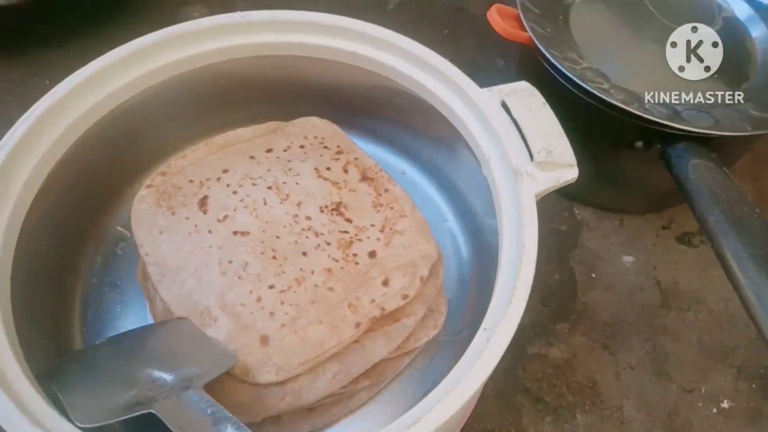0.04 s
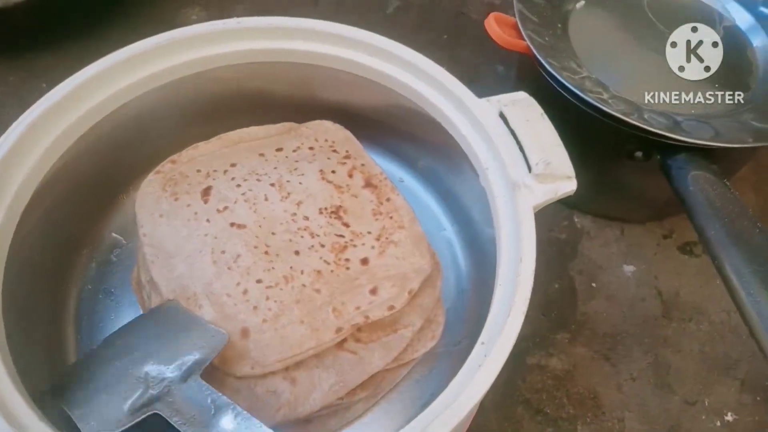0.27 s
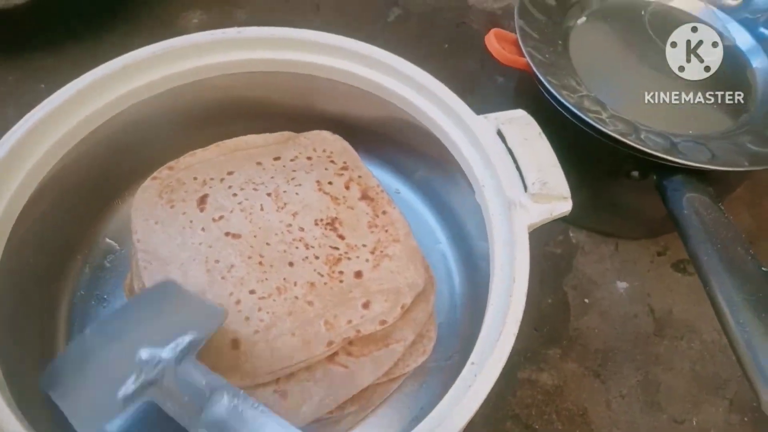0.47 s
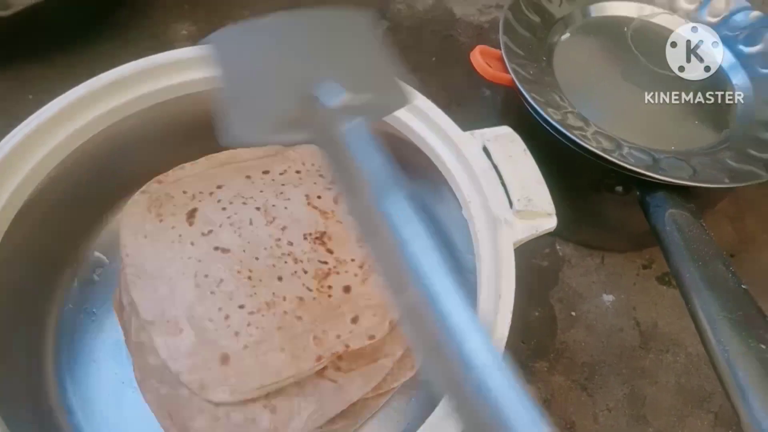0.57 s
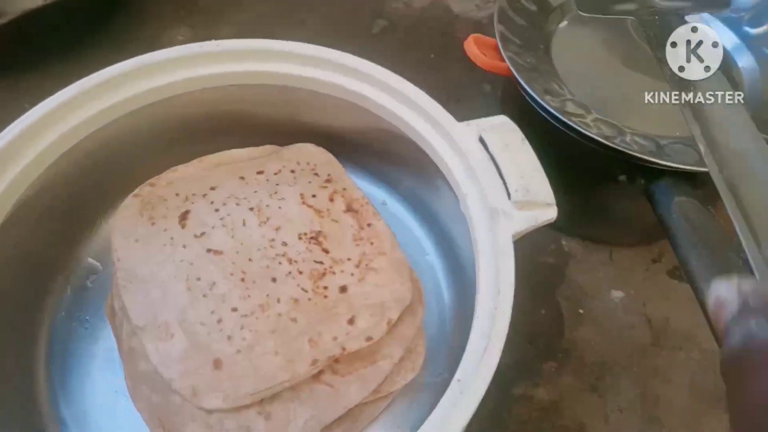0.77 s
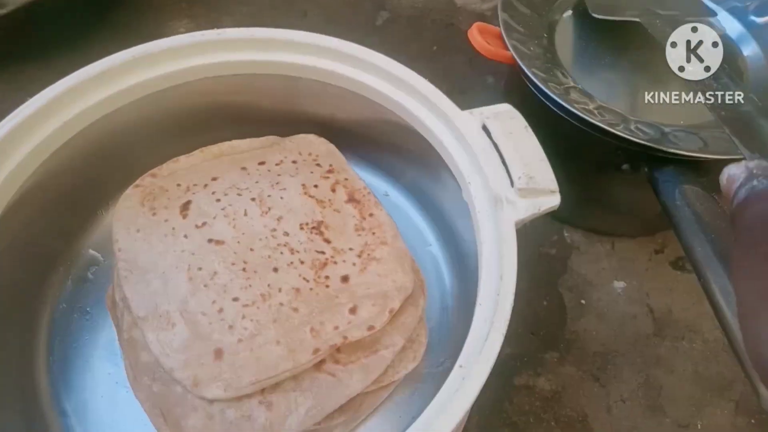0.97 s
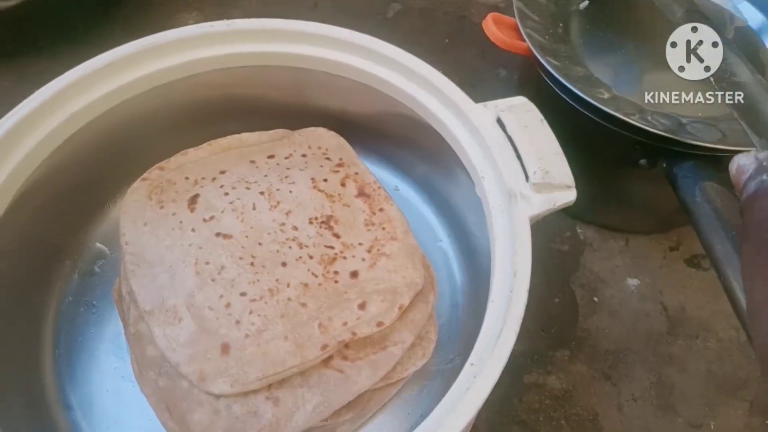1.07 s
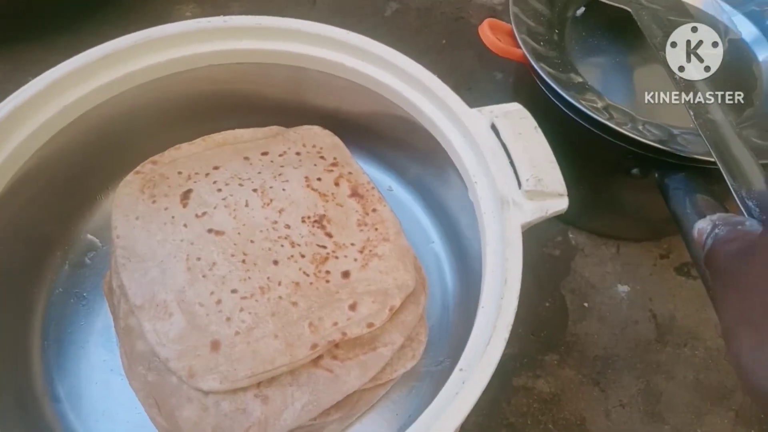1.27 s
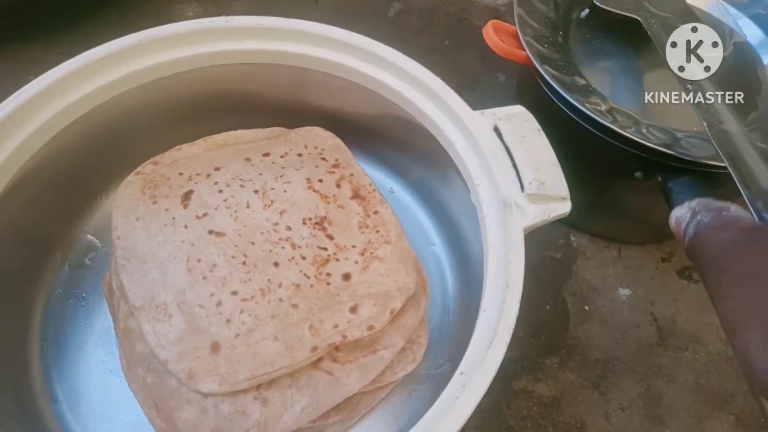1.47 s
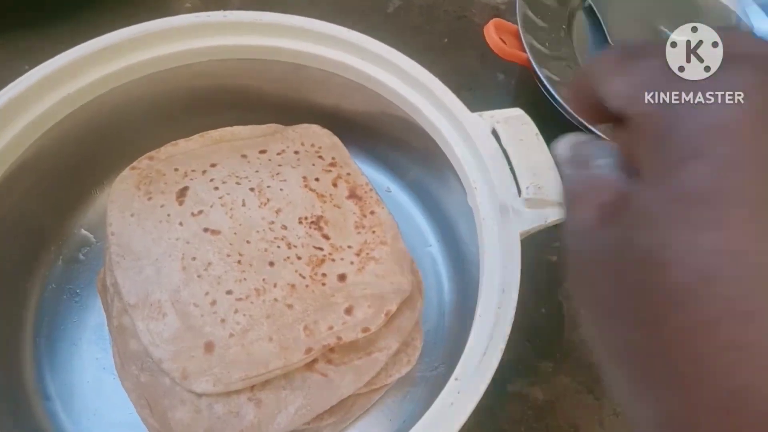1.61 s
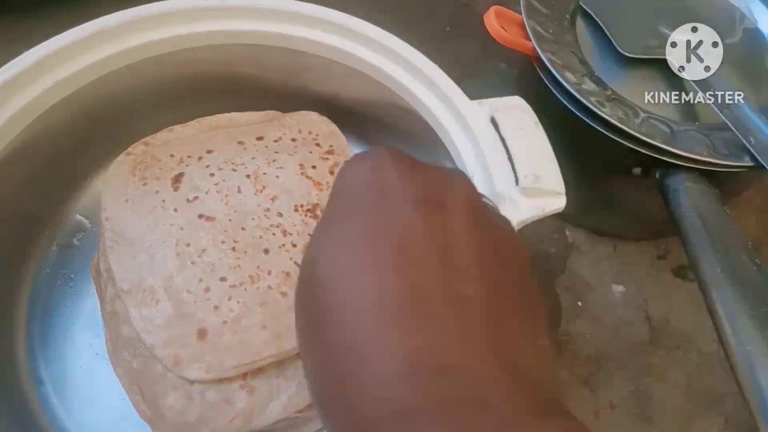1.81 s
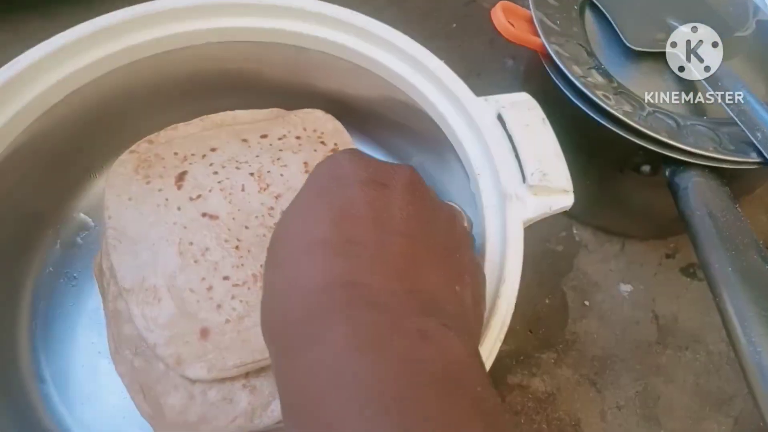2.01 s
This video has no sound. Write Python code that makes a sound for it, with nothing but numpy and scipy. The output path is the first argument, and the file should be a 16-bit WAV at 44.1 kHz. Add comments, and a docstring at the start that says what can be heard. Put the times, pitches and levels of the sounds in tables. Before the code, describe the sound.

Steel dishes clattering under a spatula, close to a phone in a small hard kitchen. A thin rasp with a faint squeal opens, then flatbread flops into a pot with a heavy dull thud at 0.24 s and softer ones until 0.5. A handle knocks woodenly at 0.77; clinks follow at 0.85-1.1. After a lull, denser, louder clanks and chatter run 1.4-1.85, then fade into quiet air.

```python
"""A stack of steel dishes in a small hard kitchen, close to a phone: a spatula laid on it makes them clink, chatter, rock.
Blows ring decaying modes and throw noise crashes; chatter is random tiny impacts on the same modes.
Before that the steel spatula scrapes out from under flatbread (noise, grit, narrow singing bands),
and the bread flops into an insulated pot (low modes, noise slaps). Handle knocks on the counter, steady air, clipped peaks.
"""
import sys
import numpy as np
from scipy import signal
from scipy.fft import rfft, irfft
from scipy.io import wavfile

SR = 44100
rng = np.random.default_rng(int(sys.argv[2]) if len(sys.argv) > 2 else 0)


def attenuation_scalar(level_db):
    """Turn a level in dB into a linear amplitude multiplier (20 dB per decade)."""
    decades = np.asarray(level_db, float) / 20
    return 10 ** decades


def log_audio(samples):
    """Write samples as a 16-bit WAV file to the path given in sys.argv[1]."""
    # one column per channel
    frames = np.atleast_2d(samples).T
    # limit to full scale, then quantise
    limited = np.clip(frames, -1, 1)
    pcm = np.round(limited * 32767).astype(np.int16)
    wavfile.write(sys.argv[1], SR, pcm)


N = 90404


def unit(x):
    """Scale to rms 1."""
    return x / np.sqrt(np.mean(x ** 2) + 1e-20)


def along(points, hz):
    """Interpolate (frequency [Hz], value) points on a log frequency axis."""
    f, v = np.transpose(points)
    return np.interp(np.log(hz + 1), np.log(f + 1), v)


def level(rows):
    """Gain per sample from (time [s], level [dB]) rows, -120 dB outside them."""
    s, db = np.transpose(rows)
    return attenuation_scalar(np.interp(np.arange(N) / SR, s, db, left=-120, right=-120))


def noise(response, size=N):
    """Noise of rms 1 with a given magnitude response."""
    hz = np.fft.rfftfreq(size, 1 / SR)
    return unit(irfft(rfft(rng.standard_normal(size)) * response(hz), size))


def dying(colour, t60, size):
    """Noise burst, each frequency decaying at its own rate; rms 1 over the first 5 ms."""
    hz, t, z = signal.stft(rng.standard_normal(size), SR, nperseg=128)
    decay_db = -60 * t / along(t60, hz)[:, None]
    z = z * attenuation_scalar(along(colour, hz)[:, None] + decay_db)
    x = signal.istft(z, SR, nperseg=128)[1][:size]
    return x / np.sqrt(np.mean(x[:SR // 200] ** 2))


def ringing(modes, scatter_db, attack_s, size=SR // 2):
    """One blow on a set of decaying modes, each level scattered at random."""
    hz, db, t60 = np.transpose(modes)[:, :, None]
    t = np.arange(size) / SR
    db = db + scatter_db * rng.standard_normal(hz.shape)
    tones = attenuation_scalar(db - 60 * t / t60) * np.sin(2 * np.pi * hz * t)
    return tones.sum(0) * (1 - np.exp(-t / attack_s))


def damped(x, free_s, added_t60_s):
    """x rings freely, then a contact adds a second decay."""
    late_s = np.maximum(np.arange(len(x)) / SR - free_s, 0)
    return x * attenuation_scalar(-60 * late_s / added_t60_s)


def grains(per_s, spread_db):
    """Random tiny impacts of either sign, a few larger than the rest."""
    sizes = np.minimum(rng.exponential(size=N), 3.5)
    return (rng.random(N) < per_s / SR) * rng.choice([-1, 1], N) * attenuation_scalar(spread_db * sizes)


def add(out, s, x):
    """Mix x into out from time s."""
    part = out[round(s * SR):][:len(x)]
    part += x[:len(part)]


# air colour: (frequency [Hz], level [dB per Hz])
AIR_COLOUR = [(12, -38), (20, 1.5), (240, 1), (335, -3.5), (570, -22.5), (674, -17), (916, -13.5),
              (1600, -18), (1740, -18), (5030, -16), (6840, -14), (15800, -45)]


def air():
    """Steady air of the kitchen: coloured stationary noise."""
    return attenuation_scalar(-44.5) * noise(lambda hz: attenuation_scalar(along(AIR_COLOUR, hz)))


# room decay: (frequency [Hz], t60 [s])
ROOM_T60 = [(150, 0.52), (1000, 0.12), (4000, 0.06), (12000, 0.19)]


def room(dry):
    """Diffuse reflections: convolution with decaying noise, 250 samples late."""
    tail = dying([(100, 0)], ROOM_T60, SR // 2)
    wet = signal.fftconvolve(np.pad(dry, (250, 0)), tail / np.linalg.norm(tail))[:N]
    return attenuation_scalar(-12) * wet


# the handle knocks on the counter: (time [s], level [dB])
KNOCKS = [(0.699, -34.5), (0.755, -25), (0.772, -8), (0.798, -16.5), (0.915, -24.5), (1.232, -30.5)]
# counter modes: (frequency [Hz], level [dB], t60 [s])
COUNTER_MODES = [(208, 1, 0.12), (265, -1.5, 0.078), (424, -10, 0.035), (474, -10, 0.11),
                 (568.3, 1.5, 0.073)]
# soft contact noise, also slaps the pot: (frequency [Hz], level [dB per Hz])
SLAP_COLOUR = [(410, 6.5), (700, -0.5), (955, 1), (1180, -0.5), (3190, 0), (4520, -11.5), (13600, -30),
               (15500, -46)]


def counter():
    """Dry wooden knocks: short modes plus a scuff of decaying noise."""
    out = np.zeros(N)
    for s, db in KNOCKS:
        add(out, s, attenuation_scalar(db - 5.5) * ringing(COUNTER_MODES, scatter_db=0.5, attack_s=0.0019))
        add(out, s, attenuation_scalar(db - 24.5) * dying(SLAP_COLOUR, [(1000, 0.15)], SR // 2))
    return out


# bread and knocks on the pot:
# (time [s], level [dB], slap over thud [dB], rim over thud [dB], base over thud [dB])
THUDS = [(0.111, -25, -7.5, -3, -12), (0.2394, 6, -21.5, -32, -5), (0.261, -7.5, -23.5, -45, -5.5),
         (0.301, -7.5, -23, -16.5, -36), (0.3645, -3, -17.5, -39, -18), (0.392, -15, -24, -25, -21),
         (0.454, -11.5, -19.5, -8.5, -14.5), (0.521, -21, -19, -25, -12)]
# pot body, rim and base modes: (frequency [Hz], level [dB], t60 [s])
POT_MODES = [(215.2, -5.5, 0.098), (243.4, -4.5, 0.085), (276, -10.5, 0.065)]
RIM_MODES = [(371, -5.5, 0.16), (480, -2, 0.075), (573, 1, 0.1), (790, -7, 0.074)]
BASE_MODES = [(160.1, 2.5, 0.23)]
BODY_TRIM_DB, SLAP_TRIM_DB, RIM_TRIM_DB = -2, -7, -7
SLAP_T60_S = 0.37
BASE_FREE_S, BASE_ADDED_T60_S = 0.064, 0.078  # the bread settles on the base and stills it


def pot():
    """Soft thuds: slow-attack modes of body, rim and damped base, with a noise slap."""
    out = np.zeros(N)
    for s, db, slap_db, rim_db, base_db in THUDS:
        slap = dying(SLAP_COLOUR, [(1000, SLAP_T60_S)], SR // 2)
        rim = ringing(RIM_MODES, scatter_db=6.0, attack_s=0.0021)
        body = ringing(POT_MODES, scatter_db=2, attack_s=0.0045)
        base = ringing(BASE_MODES, scatter_db=-0.7, attack_s=0.0069)
        base = damped(base, BASE_FREE_S, BASE_ADDED_T60_S)
        thud = attenuation_scalar(BODY_TRIM_DB) * body + attenuation_scalar(base_db) * base
        thud += attenuation_scalar(rim_db + RIM_TRIM_DB) * rim + attenuation_scalar(slap_db + SLAP_TRIM_DB) * slap
        add(out, s, attenuation_scalar(db) * thud)
    return out


# scrape pressure: (time [s], level [dB])
SCRAPE = [(0.0, -34.5), (0.17, -34), (0.234, -42.5), (0.242, -35.5), (0.346, -57), (0.372, -34.5),
          (0.422, -48.5), (0.49, -43), (0.7, -52.5)]
# rasp colour: (frequency [Hz], level [dB per Hz])
RASP_COLOUR = [(180, -50), (300, -25), (411, -14), (562, -11.5), (835, -8), (4000, -2.5), (4960, -12),
               (8560, -20.5), (12500, -18.5), (15500, -27)]
# singing of the edge: (time [s], level [dB])
SQUEAL = [(0.07, -55), (0.146, -48), (0.174, -43), (0.184, -49), (0.204, -42), (0.248, -60), (0.26, -66)]
# blade edge resonances: (frequency [Hz], half-width [Hz], level [dB])
EDGE_BANDS = [(1670, 69, -7), (4025, 38, 12.5), (6300, 120, -2), (7220, 150, -4), (11100, 120, -7),
              (12200, 96, 0), (13700, 120, -7)]


def scrape():
    """The blade rasps over steel and bread (noise and grit) while its edge sings in narrow bands."""
    grit = np.convolve(grains(per_s=1900, spread_db=5.0), dying(RASP_COLOUR, [(1000, 0.003)], 400))[:N]
    rasp = unit(noise(lambda f: attenuation_scalar(along(RASP_COLOUR, f))) + 0.97 * unit(grit))
    edge = noise(lambda f: sum(attenuation_scalar(db) * w ** 2 / np.hypot(f - hz, w) ** 2 for hz, w, db in EDGE_BANDS))
    return level(SCRAPE) * rasp + attenuation_scalar(10.5) * level(SQUEAL) * edge


# light touches, one mode each: (time [s], level [dB], nearest mode [Hz], free ring [s])
CLINKS = [(0.842, -21.5, 1435, 0.076), (.846, -18, 562, 0.035), (1.048, -14.5, 545, 0.039),
          (.85, -23, 3530, 0.088), (.85, -28, 2360, 0.0069), (.858, -26, 1890, 0.12),
          (.885, -24, 3074, 0.017), (.908, -17.5, 3526, 0.012), (0.907, -25.5, 3074, 0.012),
          (.982, -25.5, 3020, 0.021), (1.055, -21.5, 2360, 0.016), (1.087, -11, 3020, 0.012),
          (1.09, -9, 3325, 0.0078), (1.10, -24.5, 1071, 0.05), (1.10, -13, 545, 0.073),
          (1.138, -27.5, 2360, 0.15), (1.126, -26.5, 3020, 0.09), (1.11, -31, 1935, 0.102),
          (1.411, -7.5, 2239, 0.039), (1.441, -17, 1348, 0.083), (1.47, -25, 2622, .08),
          (1.70, -24.5, 1348, .06), (1.44, -6.5, 3405, 0.01), (1.438, -13, 3074, .03),
          (1.452, -11.5, 1935, 0.16), (1.46, -21, 562, 0.035), (1.481, -9.5, 3230, 0.024),
          (1.581, -17, 1348, 0.105), (1.582, -15, 3020, 0.038), (1.602, -14, 1935, 0.16),
          (1.635, -16, 362, .065), (1.61, -8.5, 455, 0.026), (1.685, -6.5, 455, 0.016),
          (1.705, -23, 3230, 0.04), (1.722, -22, 2360, 0.04), (1.79, -30, 1935, 0.045),
          (.976, -31, 2360, 0.024), (1.834, -33, 3458, 0.097), (1.84, -24.5, 405, 0.066),
          (1.799, -30.5, 2622, .14)]
# the top dish rocks and taps the one below: (time [s], level [dB])
TAPS = [(0.961, -22), (0.9904, -25.5), (1.0849, -8), (1.1497, -19.5), (1.5423, -20), (1.6288, -23),
        (1.676, -13), (1.742, -14), (1.7875, -17.5), (1.833, -25), (1.857, -23)]
# tap modes: (frequency [Hz], level [dB], t60 [s])
TAP_MODES = [(1550, 1, 0.019), (1777, 5.5, 0.015)]
# dish boom, dish ring and blade modes, also for blows and chatter: (frequency [Hz], level [dB], t60 [s])
BOOM_MODES = [(362, -11, 0.18), (405, -6, 0.085), (455, 2, 0.076), (495.5, 4, 0.053), (545, -4.5, 0.17),
              (562, -13.5, 0.26)]
RING_MODES = [(1071, -15, 0.15), (1348, -8.5, 0.24), (1435, -1.5, 0.14), (1890, -11, 0.54),
              (1935, -10.5, 0.66)]
BLADE_MODES = [(2239, 0.5, 0.092), (2360, -13, 0.43), (2622, -12, 0.42), (2920, -15, 0.47),
               (2997, 11.5, 0.031), (3020, -11, 0.38), (3074, 7.5, 0.082), (3230, 1.5, 0.11),
               (3325, 4, 0.075), (3405, 3.5, 0.14), (3458, -5.5, 0.32), (3526, -13, 0.2), (3530, -15, 0.7),
               (4186, -5.5, 0.088)]
# steel sliding on steel, also for chatter: (frequency [Hz], level [dB per Hz])
GRIT_COLOUR = [(410, -45), (700, -44), (1120, -12), (1880, -4), (2810, -8.5), (3460, 2), (4540, -14),
               (15600, -28.5)]
CLINK_TICK_DB = -18.5  # crack over note
CLINK_ADDED_T60_S = 0.037


def clinks():
    """Touches ring single steel modes until damped, each with a noise tick; taps are short mode pairs."""
    out = np.zeros(N)
    for s, db, hz, free_s in CLINKS:
        modes = BOOM_MODES + RING_MODES + BLADE_MODES
        near_hz, _, t60_s = min(modes, key=lambda mode: abs(mode[0] - hz))
        note = ringing([(near_hz, 0, t60_s)], scatter_db=1, attack_s=0.0013)
        add(out, s, attenuation_scalar(db) * damped(note, free_s, CLINK_ADDED_T60_S))
        add(out, s, attenuation_scalar(db + CLINK_TICK_DB) * dying(GRIT_COLOUR, [(1000, 0.16)], SR // 8))
    for s, db in TAPS:
        add(out, s, attenuation_scalar(db - 1.0) * ringing(TAP_MODES, scatter_db=1, attack_s=0.00074))
    return out


# treble modes of the stack: (frequency [Hz], level [dB], t60 [s])
SHIMMER_MODES = [(5120, 1.5, 0.17), (5660, -5, 0.13), (5720, -0.5, 0.17), (7180, -2, 0.15)]
CROWD_LOW_HZ, CROWD_HIGH_HZ, CROWD_DB, CROWD_MEAN_T60_S = 4270, 15950, -9.5, 0.068


def treble_modes():
    """Treble of the stack: listed modes and 130 random ones."""
    span_hz = CROWD_HIGH_HZ - CROWD_LOW_HZ
    crowd = [(CROWD_LOW_HZ + span_hz * u, CROWD_DB, CROWD_MEAN_T60_S * (0.5 + v))
             for u, v in rng.random((130, 2))]
    return SHIMMER_MODES + crowd


# blows on the dishes: (time [s], level [dB], dish boom [dB], dish ring [dB], crash and treble [dB])
BLOWS = [(0.845, -7, -12.5, 0, -20), (0.9073, -26, -37, -15, -8), (0.96, -22.5, -26, -3, -9.5),
         (1.0454, -18, 8, 8.5, -11), (1.052, -8.5, -13, -19, -19.5), (1.0857, 0, -10.5, -7, -14.5),
         (1.0958, -18.5, 4.5, 11, -23), (1.2646, -42.5, -16, -15, 1), (1.3692, -21.5, -43, -13.5, -9.5),
         (1.4341, 0.5, -10.5, -1, -13), (1.4468, -3, -5, -3.5, -8.5), (1.5464, -13, 2.5, 7.5, -15),
         (1.5786, -2, -9, 1.5, -9), (1.6061, -6, 0, -32, -13.5), (1.6244, -12, -22, 11.5, -6),
         (1.6768, -19, 3, 9, -34), (1.6939, -12.5, 1.5, 8, -8.5), (1.7094, -9.5, -7.5, -1, -11.5),
         (1.7436, -13, -6.5, 5.5, -18), (1.8048, -20, -1.5, 6, -20), (2.012, -36, -31, -26, -5.5)]
# crash colour: (frequency [Hz], level [dB per Hz])
CRASH_COLOUR = [(350, -30), (600, -34), (822, -14), (1360, -17), (1950, -9), (2460, -6), (3100, 0),
                (4800, -18.5), (6060, -13), (15800, -57)]
# crash decay: (frequency [Hz], t60 [s])
CRASH_T60 = [(800, 0.25), (3000, 0.15), (6000, 0.16), (14000, 0.095)]
RING_TRIM_DB, BLADE_DB, SHIMMER_TRIM_DB, CRASH_TRIM_DB = -14, -17.5, -15.5, 0.5
SCATTER_DB = 3
BURST_DECAY_S = 0.0073  # time constant
BLOW_FREE_S, BLOW_ADDED_T60_S = 0.12, 0.39


def blows(treble):
    """A blow is a short burst of contacts on ring, blade and treble modes, plus boom and noise crash."""
    out, t = np.zeros(N), np.arange(SR // 25) / SR
    for s, db, boom_db, ring_db, crash_db in BLOWS:
        burst = rng.standard_normal(len(t)) * (rng.random(len(t)) < 0.03) * np.exp(-t / BURST_DECAY_S)
        burst[0] = 1.83  # first contact
        modes = (attenuation_scalar(ring_db + RING_TRIM_DB) * ringing(RING_MODES, SCATTER_DB, attack_s=0.000043)
                 + attenuation_scalar(BLADE_DB) * ringing(BLADE_MODES, SCATTER_DB, attack_s=0.00057)
                 + attenuation_scalar(crash_db + SHIMMER_TRIM_DB) * ringing(treble, scatter_db=5.5, attack_s=0.00059))
        struck = signal.fftconvolve(modes, burst / np.linalg.norm(burst))[:SR // 2]
        struck = damped(struck, BLOW_FREE_S, BLOW_ADDED_T60_S)
        boom = attenuation_scalar(boom_db) * ringing(BOOM_MODES, scatter_db=2.5, attack_s=0.0051)
        crash = attenuation_scalar(crash_db + CRASH_TRIM_DB) * dying(CRASH_COLOUR, CRASH_T60, SR // 2)
        add(out, s, attenuation_scalar(db) * (struck + boom + crash))
    return out


# contact pressure: (time [s], level [dB], sliding over ringing [dB])
CHATTER = [(0.691, -37.5, -4), (0.788, -36.5, -12.5), (0.882, -30.5, 1), (1.014, -29.5, -5),
           (1.044, -29, -6), (1.188, -48.5, 2), (1.334, -61, 15), (1.426, -22.5, -6), (1.552, -17, -14.5),
           (1.6, -22, 2.5), (1.684, -21.5, -14), (1.842, -31, -4), (1.926, -44, -4), (2.05, -60, 11)]
# boom, ring, blade and treble under chatter: level [dB]
RUBBED_DB = [-9, -13.5, -10.5, -27.5]
CHATTER_PER_S, CHATTER_SPREAD_DB = 1300, 3.5


def chatter(treble):
    """Random tiny contacts excite the steel modes and a sliding noise."""
    bodies = [ringing(m, 0, 0.0011) for m in (BOOM_MODES, RING_MODES, BLADE_MODES, treble)]
    steel = sum(attenuation_scalar(db) * b / np.linalg.norm(b) for db, b in zip(RUBBED_DB, bodies))
    s, db, slide_db = np.transpose(CHATTER)
    touches = unit(grains(CHATTER_PER_S, CHATTER_SPREAD_DB))
    grit = dying(GRIT_COLOUR, [(1000, 0.035)], SR // 8)
    sliding = np.convolve(level(np.c_[s, db + slide_db]) * touches, grit / np.linalg.norm(grit))[:N]
    return sliding + signal.fftconvolve(level(np.c_[s, db]) * touches, steel)[:N]


def dishes():
    """Blows and chatter share one set of treble modes."""
    treble = treble_modes()
    return blows(treble) + chatter(treble)


def scene():
    """Sources, room reflections and air, as one channel."""
    dry = pot() + scrape() + dishes() + clinks() + counter()
    return (dry + room(dry) + air())[None]


def roll_off(x):
    """The treble ends steeply here."""
    return signal.sosfilt(signal.butter(12, 15990, fs=SR, output="sos"), x)


def record(dry):
    """The phone's microphone drops the deep bass and clips peaks with a rounded knee."""
    highpass = signal.butter(2, 82, "high", fs=SR, output="sos")
    x = signal.sosfilt(highpass, dry)
    hardness = 8
    clipped = x / (1 + np.abs(x) ** hardness) ** (1 / hardness)  # ceiling 1.0
    return roll_off(clipped)


dry = scene()
out = record(dry)
log_audio(out)
```